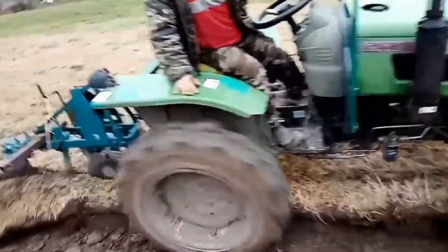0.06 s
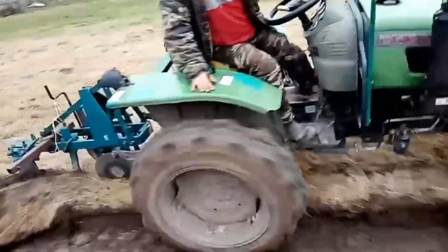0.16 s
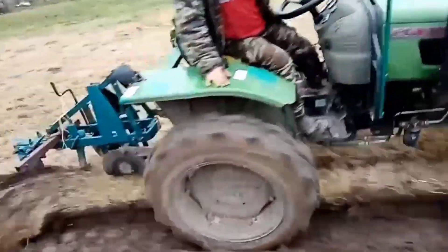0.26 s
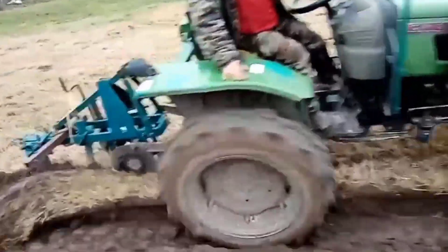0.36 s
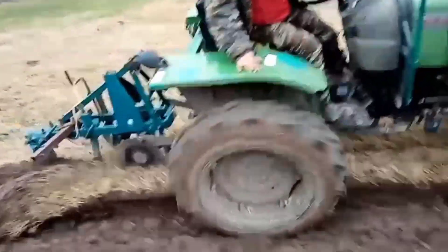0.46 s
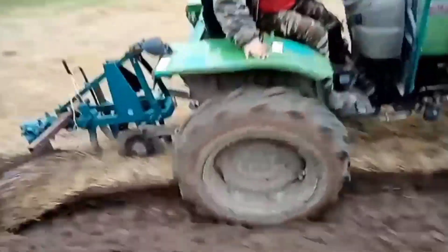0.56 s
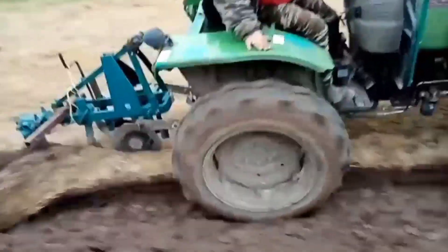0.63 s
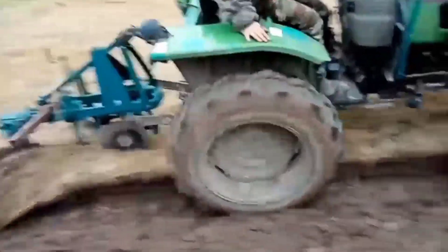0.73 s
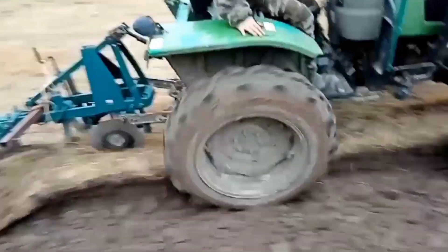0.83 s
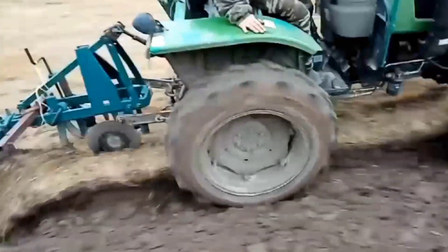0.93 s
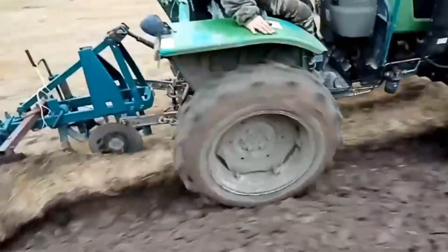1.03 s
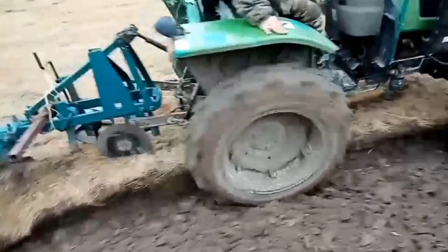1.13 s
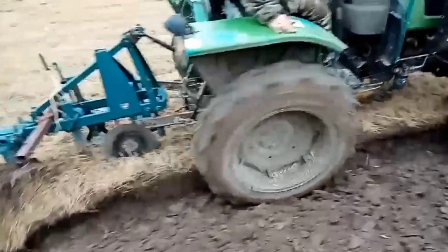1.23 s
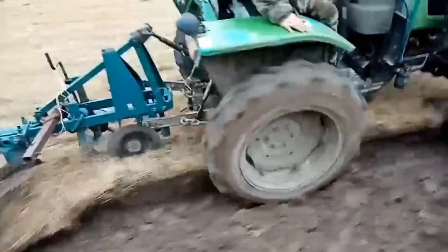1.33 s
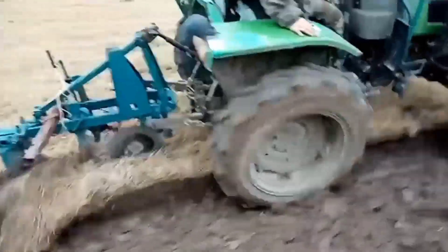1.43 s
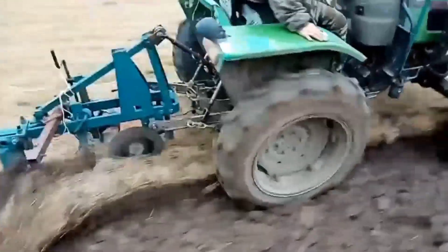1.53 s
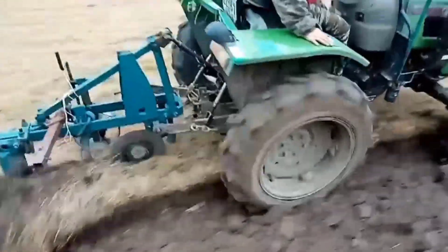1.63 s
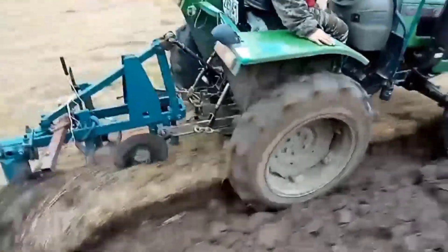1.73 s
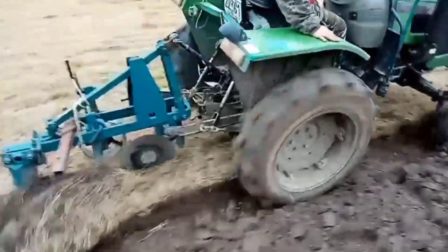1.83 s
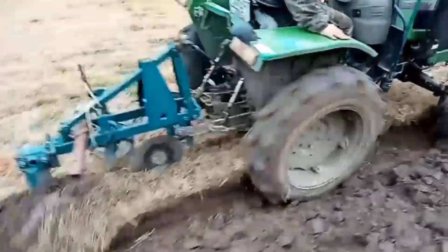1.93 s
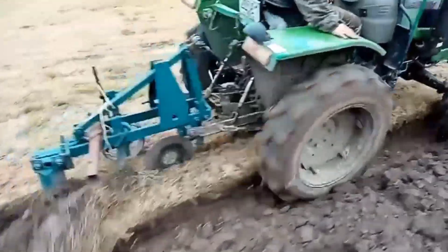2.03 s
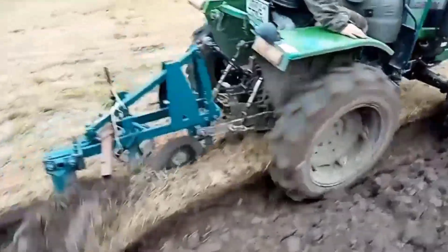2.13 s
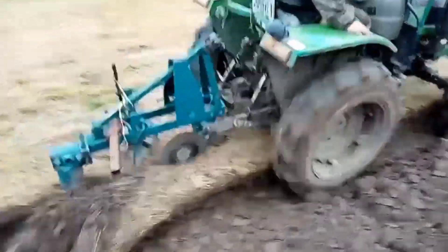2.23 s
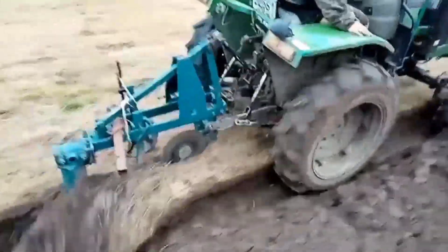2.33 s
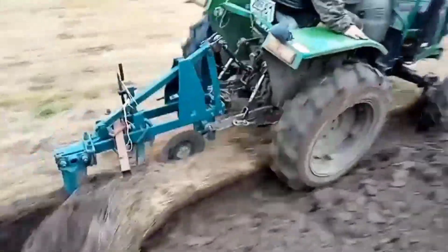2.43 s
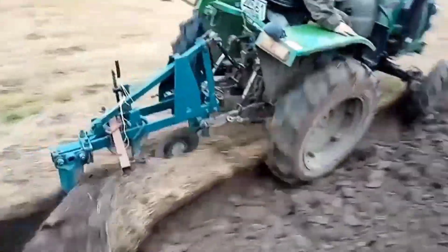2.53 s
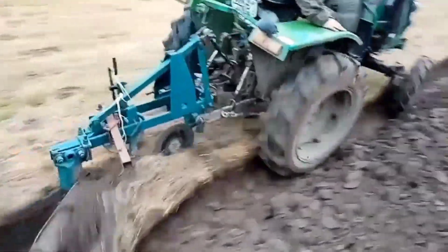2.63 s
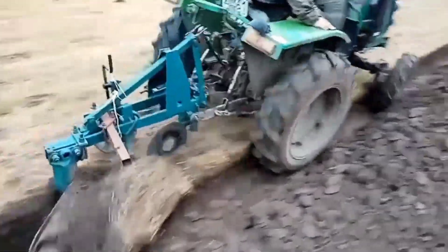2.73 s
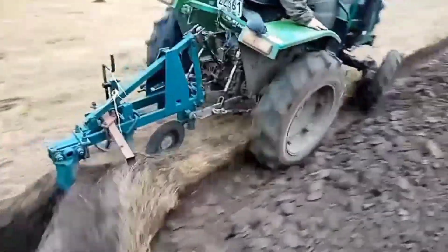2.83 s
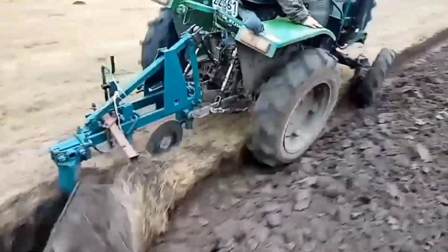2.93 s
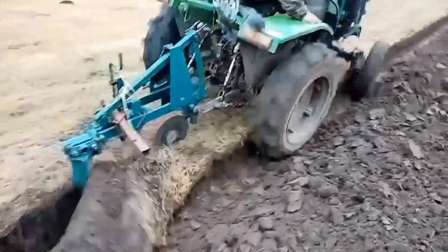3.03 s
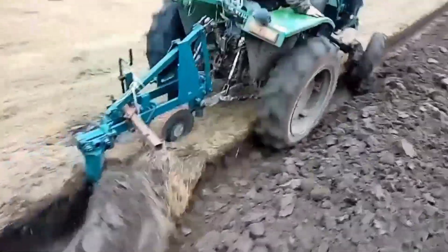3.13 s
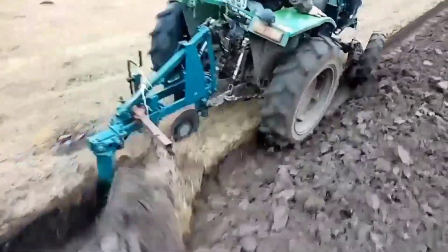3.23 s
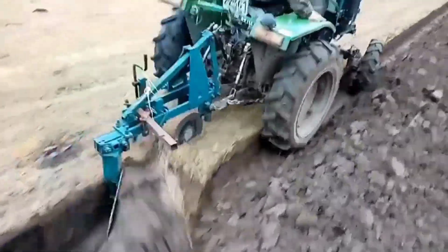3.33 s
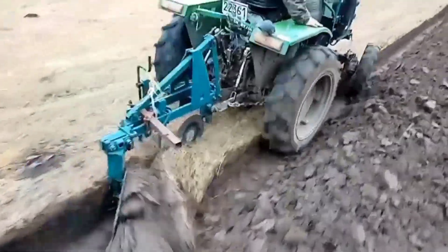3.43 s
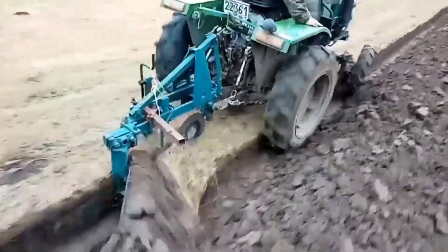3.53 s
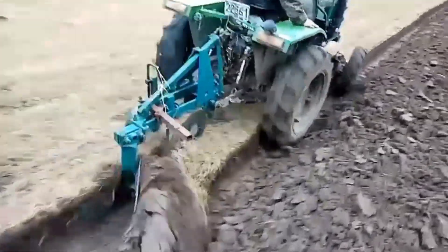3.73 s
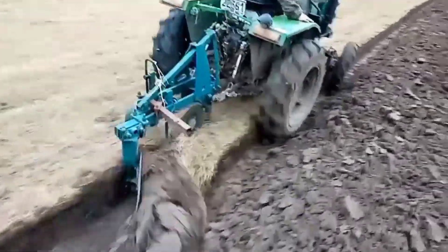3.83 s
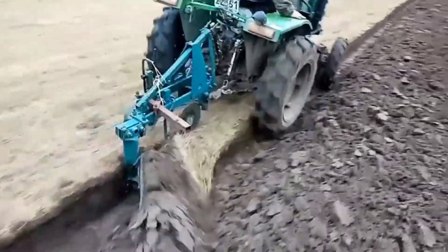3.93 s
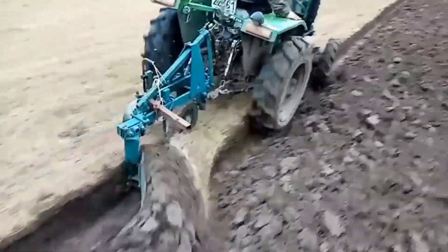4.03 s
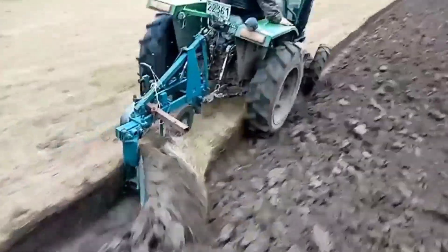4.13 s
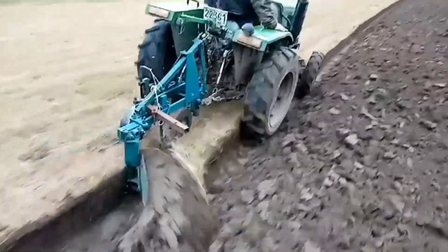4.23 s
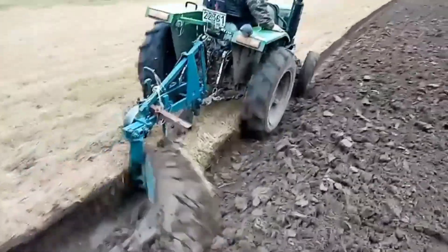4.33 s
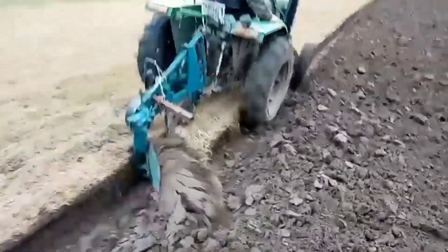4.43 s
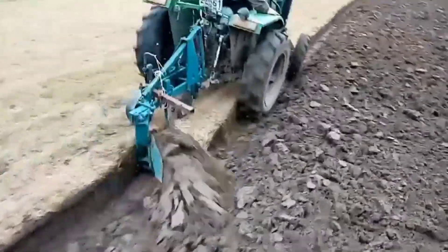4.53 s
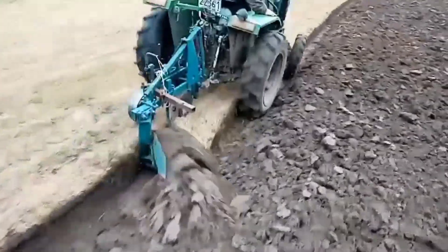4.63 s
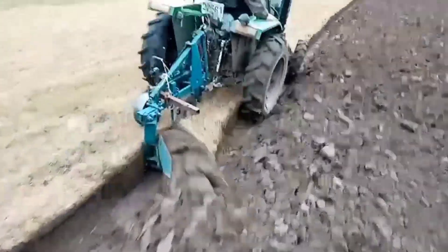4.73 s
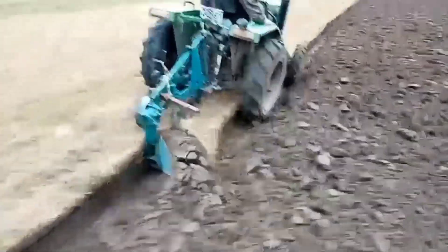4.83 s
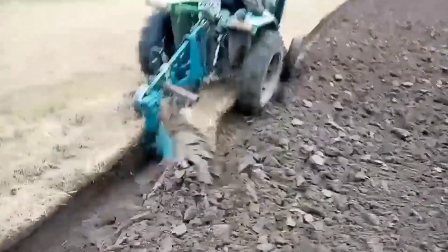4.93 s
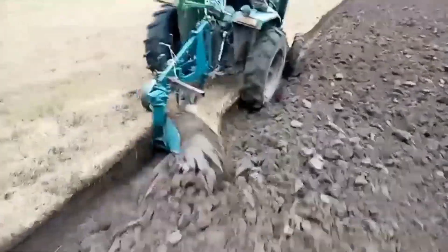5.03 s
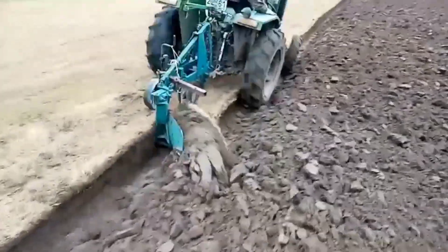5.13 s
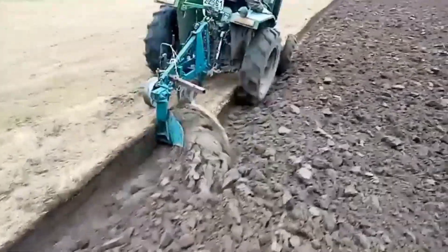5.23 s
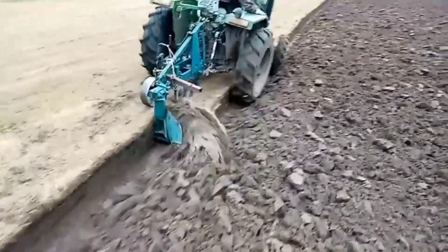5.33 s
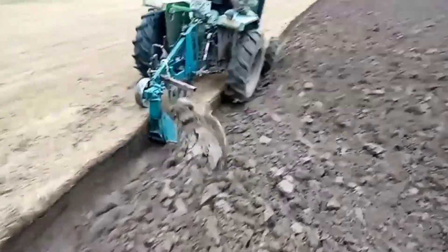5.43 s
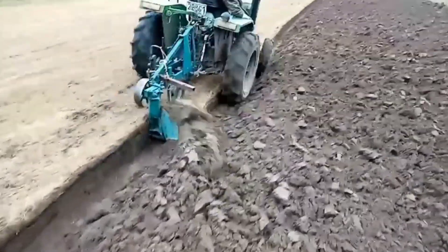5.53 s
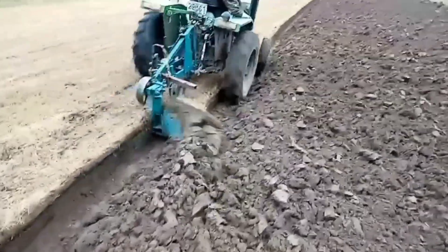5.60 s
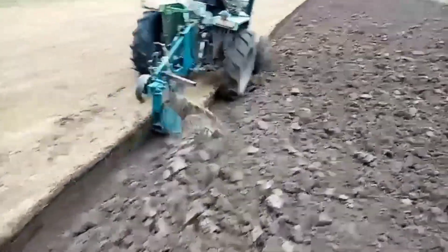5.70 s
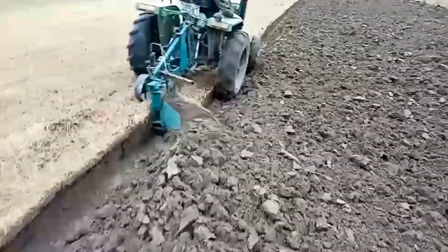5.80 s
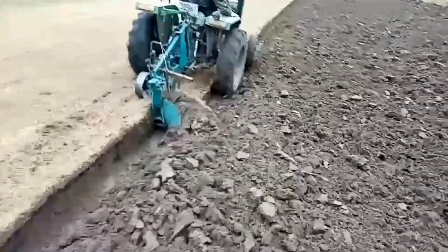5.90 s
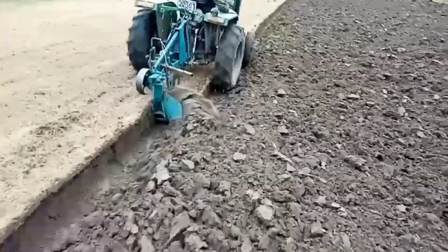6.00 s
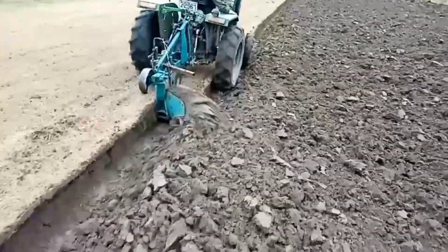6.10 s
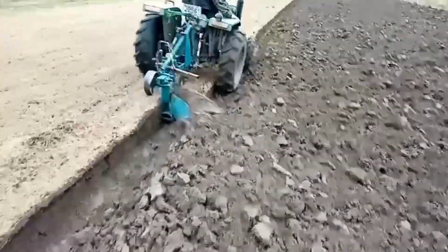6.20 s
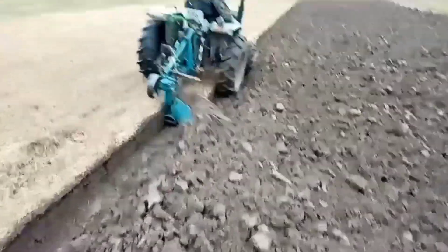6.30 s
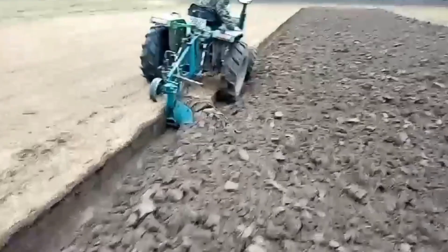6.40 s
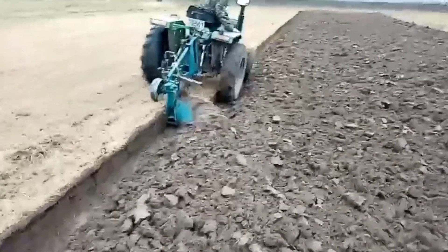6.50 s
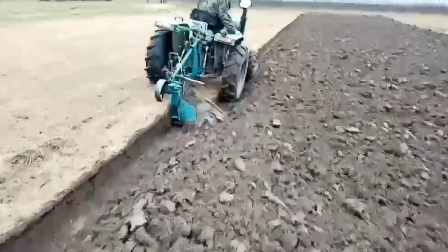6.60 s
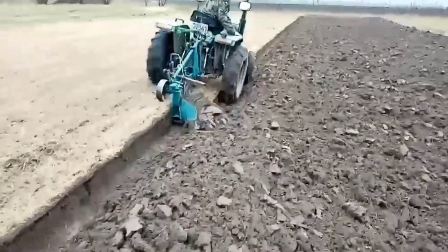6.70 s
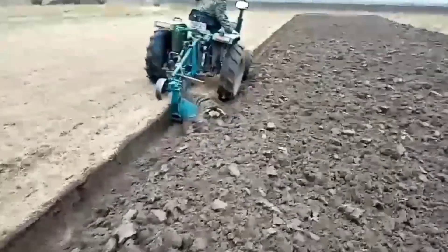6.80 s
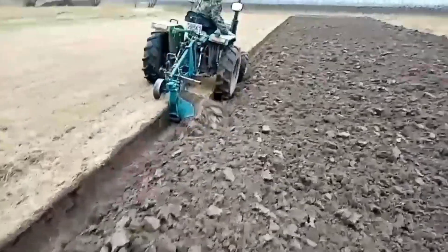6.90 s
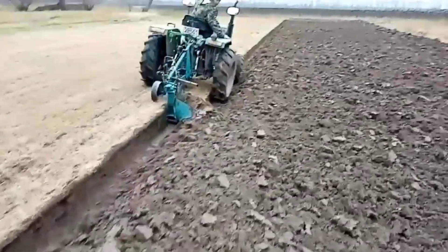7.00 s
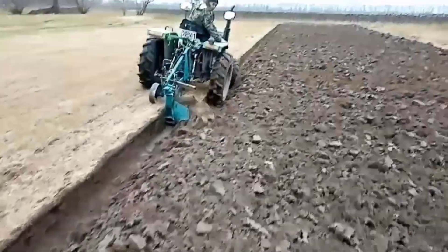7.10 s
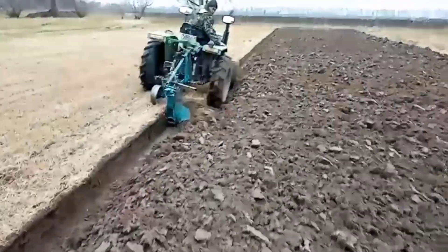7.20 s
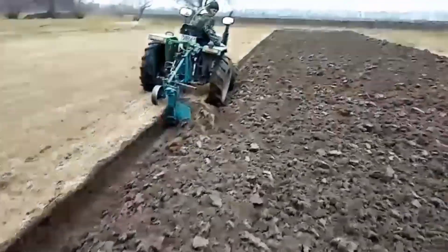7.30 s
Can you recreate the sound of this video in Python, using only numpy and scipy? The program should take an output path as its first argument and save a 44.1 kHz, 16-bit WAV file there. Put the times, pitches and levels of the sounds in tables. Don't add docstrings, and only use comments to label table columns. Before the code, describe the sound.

A small three-cylinder diesel tractor drones and clatters steadily as it passes close by and slowly pulls away, with a few tiny metallic squeaks.

```python
import sys
import numpy as np
from scipy import signal
from scipy.fft import rfft, irfft, next_fast_len
from scipy.io import wavfile
from scipy.ndimage import uniform_filter1d, map_coordinates

SR = 44100
rng = np.random.default_rng(int(sys.argv[2]) if len(sys.argv) > 2 else 0)


def to_wav(sig):
    pcm = np.clip(np.atleast_2d(sig), -1, 1) * 32767
    pcm = np.round(pcm).astype(np.int16)
    wavfile.write(sys.argv[1], SR, pcm.T)


def natural_amplitude(level_db):
    exponent = np.asarray(level_db, float) / 20
    return 10 ** exponent


N = 324135


def unit(x):
    return x / np.sqrt(np.mean(x ** 2) + 1e-20)


def along(points, hz):
    f, v = np.transpose(points)
    return np.interp(np.log(hz + 1), np.log(f + 1), v)


def curves(rows):
    s, *cols = np.transpose(rows)
    return [np.interp(np.arange(N) / SR, s, c) for c in cols]


def wobble(rate):
    knots = rng.standard_normal(int(N * rate / SR) + 4)
    return map_coordinates(knots, [np.arange(N) * rate / SR])


def filtered(x, response):
    m = next_fast_len(N + 8192)
    return irfft(rfft(x, m) * response(np.fft.rfftfreq(m, 1 / SR)), m)[..., :N]


def patchy(patchy_db):
    z = signal.stft(rng.standard_normal((2, N)), nperseg=512)[2]
    field = rng.standard_normal(z.shape[1:])
    field = uniform_filter1d(field, size=4, axis=0)
    field = uniform_filter1d(field, size=12, axis=1)
    return signal.istft(z * natural_amplitude(patchy_db * unit(field)), nperseg=512)[1][:, :N]


# (time [s], firing rate [1/s])
FIRING_RATE = [(0.0, 52.08), (0.6, 51.9), (1.08, 50.83), (1.35, 52.37), (1.62, 51.35), (2.32, 52.29),
               (2.7, 51.93), (3.36, 52.36), (3.37, 51.91), (3.82, 51.25), (4.24, 52.03), (4.65, 52.36),
               (4.88, 51.23), (5.43, 52.16), (6.16, 51.74), (6.41, 52.35), (6.69, 50.85), (7.35, 51.8)]


def firings():
    return np.cumsum(curves(FIRING_RATE)[0]) / SR


BEARINGS = [-25, 20, 42, 60, 71]


def heard(patterns):
    nearest_m, nearest_s, drive_m_per_s = 2.5, 1.0, 1.1
    gone = drive_m_per_s * (np.arange(N) / SR - nearest_s)
    bearing = np.degrees(np.arctan2(gone, nearest_m))
    loss_db = 20 * np.log10(np.hypot(gone, nearest_m) / nearest_m)
    return [np.interp(bearing, BEARINGS, db) - loss_db for db in patterns]


# (frequency [Hz], density [dB per Hz])
SCRAPE = [(3000, -22), (4500, -4), (6000, 0), (8000, -5), (11000, -8), (16000, -16)]
# (time [s], length [s], tone [Hz], tone level [dB], scrape level [dB])
SQUEAKS = [
    (1.814, 0.02, 5650, -31, -34),
    (2.783, 0.019, 5500, -31, -25.5),
    (2.918, 0.02, 5520, -28, -33),
    (3.088, .022, 6900, -41, -26.5),
    (3.682, 0.027, 5270, -36, -26.5),
    (3.683, 0.0084, 6270, -23, -42),
    (5.59, .015, 7100, -44, -57),
]


def linkage():
    t = np.arange(N) / SR
    rough = np.cumsum(90 * wobble(200)) / SR
    scrape = unit(filtered(rng.standard_normal(N), lambda f: natural_amplitude(along(SCRAPE, f))))
    out = np.zeros(N)
    for s, length, hz, tone_db, scrape_db in SQUEAKS:
        turn = 2 * np.pi * (hz * t + rough)
        squeak = np.sin(turn) + 0.35 * np.sin(2 * turn)
        envelope = np.exp(-((t - s) / length) ** 2)
        out += envelope * (natural_amplitude(tone_db + 3.0) * squeak + natural_amplitude(scrape_db) * scrape)
    return out


def repeating(count):
    place = (firings() / 3 % 1 * 2550).astype(int)
    shapes = rng.standard_normal((count, 2, 2552))
    weights = np.array([wobble(1.605) for _ in shapes])
    weights /= np.linalg.norm(weights, axis=0)
    return sum(w * shape[:, place] for w, shape in zip(weights, shapes))


# (time [s], turned away [0-1], lead of the left microphone [samples])
PASS = [
    (0, 0, 33.2),
    (1.5, 0.29, 32.6),
    (3.3, 0.83, 36.8),
    (5, 1, 41.7),
    (7.35, 1, 42),
]
# (time [s], pointing away [0-1])
BEHIND = [
    (0, 0),
    (1.5, .25),
    (3.3, .95),
    (7.35, 1.1),
]
CYLINDERS = [.88, .82, 1.25]
# (frequency [Hz], density [dB per Hz])
NEAR = [(200, -11.5), (400, -9), (540, -5), (1150, -5.5), (1450, -4), (2200, -1), (2700, -7), (3800, -12.5),
        (5600, -13.5), (6300, -8.5), (8500, -15), (9300, -20), (13600, -21), (14900, -6)]
FAR = [(200, -15), (400, -22.5), (540, -6.5), (1150, -9.5), (1450, 0), (2200, -3), (2700, -12.5),
       (3800, -17), (5600, -15.5), (6300, -12), (8500, -22.5), (9300, -28), (13600, -29.5), (14900, -20)]
# (frequency [Hz], width [Hz], level beside [dB], level behind [dB])
PANELS = [(1030, 22, -8, -1.5), (1453, 52, -10.5, -4.5), (1544, 59, -3, -5.5), (1708, 71, 0, -4.5),
          (2185, 100, -37, -0.5), (2330, 42, -16, -6), (2896, 300, -9, 3.5), (4875, 58, -3.5, 0),
          (6270, 39, 5, -4), (6650, 90, 0, -4), (6920, 42, -7, 0), (7310, 100, -1, -23)]


def mechanical(burns, lo_hz, hi_hz, blow, width, repeat, patchy_db):
    away = curves(PASS)[0]
    phase = firings() - .88 + .28 * curves(BEHIND)[0]

    def flare(lag, fall):
        since = (phase - lag) % 1
        return np.exp(-since / fall) * np.minimum(since / .04, 1)

    def ring(f, side):
        modes = (natural_amplitude(db[side]) * 1j * f * w / (c * c - f * f + 1j * f * w) for c, w, *db in PANELS)
        return 1 + sum(modes)

    def band(f):
        return 1 / np.sqrt((1 + (lo_hz / (f + 1)) ** 8) * (1 + (f / hi_hz) ** 8))

    firing = np.floor(phase).astype(int)
    strength = np.take(CYLINDERS, firing % 3) * burns[firing]
    crack = flare(.04, .045) + .25 * flare(.5, .1)
    gate = 1 + blow * strength * (flare(0, width) + crack)
    noise = gate * (unit(patchy(patchy_db)) + repeat * repeating(count=4))
    near = unit(filtered(noise, lambda f: band(f) * ring(f, 0) * natural_amplitude(along(NEAR, f))))
    far = unit(filtered(noise, lambda f: band(f) * ring(f, 1) * natural_amplitude(along(FAR, f))))
    return (1 - away) * near + away * far


ENGINE = [
    (-35, -36, -32, -31, -32),
    (-28, -27, -28.5, -28, -27.5),
    (-29, -31.5, -30, -32, -33.5),
    (-32.5, -33.5, -34, -37, -45),
]
LOAD_DB = [-0.018, 0.21, 0.67, -0.41]


def engine():
    free_rate = 51.8
    load_db = np.outer(LOAD_DB, free_rate - curves(FIRING_RATE)[0])
    intake_db, knock_db, valves_db, fan_db = heard(ENGINE) + load_db
    shake = 0.33 * wobble(9)
    burns = natural_amplitude(1.5 * rng.standard_normal(500))
    ground = natural_amplitude(-57) * mechanical(burns, 18, 70, blow=0, width=.5, repeat=0, patchy_db=7)
    rumble = natural_amplitude(intake_db - 2.5) * mechanical(
        burns, 75, 330, blow=.1, width=.5, repeat=.5, patchy_db=.4)
    intake = natural_amplitude(intake_db + 6.0 + 0.35 * wobble(8.1)) * mechanical(
        burns, 250, 1020, blow=0.64, width=0.15, repeat=0.76, patchy_db=0.5)
    knock = natural_amplitude(knock_db + 4 + shake) * mechanical(
        burns, 1210, 3050, blow=1.0, width=0.36, repeat=1.3, patchy_db=3.7)
    valves = natural_amplitude(valves_db + 5 + shake) * mechanical(
        burns, 3580, 9900, blow=0.41, width=0.7, repeat=0.18, patchy_db=1.37)
    fan = natural_amplitude(fan_db + 10.0 + 0.74 * wobble(14)) * mechanical(
        burns, 8800, 15900, blow=0.67, width=0.87, repeat=0, patchy_db=1.5)
    return ground + rumble + intake + knock + valves + fan


EXHAUST = [
    (-22.5, -28.5, -26.5, -24.5, -20.5),
    (-23.5, -25, -25, -24, -28),
    (-32.5, -35, -29.5, -29, -31),
    (-33, -36, -36, -33, -34.5),
]
STAGES = [1, 3.5, 6.4]
# (multiple of the engine cycle, level beside [dB], level passing [dB], level behind [dB])
UNEVEN = [(3.02, -41, -42.5, -47), (3.95, -58, -53, -64), (7.02, -52, -44.5, -49), (8.03, -43, -55, -51),
          (9.96, -46.5, -52, -50.5), (11.07, -45.5, -57, -54.5), (14.025, -48.5, -53.5, -52.5),
          (17.09, -58, -52, -53), (18.09, -42.5, -41, -48), (20.85, -53, -51.5, -52.5),
          (21.8, -50, -47, -63), (27, -55, -65, -67), (27.9, -60, -47, -54), (30.04, -47, -37, -42),
          (31.05, -68, -47, -72), (31.55, -47, -50, -68), (33.7, -39, -48, -69), (34.16, -55, -38, -54),
          (35.4, -56, -43, -61.5), (39, -57, -42, -46.5), (59.14, -59, -44, -46.5),
          (83.8, -38.5, -40.5, -50)]


def exhaust():
    turn = 2 * np.pi * firings()
    behind = curves(BEHIND)[0]

    def spread(k):
        return 1.8 + .35 * k * k + .3 * (k == 2) + 1.3 * abs(k - 2) ** .8 * behind

    tone = np.zeros(N)
    for k, db in enumerate(heard(EXHAUST), 2):
        tone += natural_amplitude(db + 0.29 * wobble(14)) * np.cos(k * turn + spread(k))
    for n, *stage_db in UNEVEN:
        nearest = 3 * round(n / 3)
        free = abs(n - nearest) > .1
        n = n if free else nearest
        loose = .1 + .9 * free * (n < 50)
        drift = free * (6 * rng.random() + .5 * wobble(2.05))
        level_db = np.interp(np.arange(N) / SR, STAGES, stage_db) + 2.34 * loose * wobble(3)
        tone += natural_amplitude(level_db) * np.cos(n / 3 * turn + spread(n / 3) + drift)
    return np.sqrt(2) * tone


# (frequency [Hz], level [dB])
LEFT = [(100, -3.5), (1000, -3.5), (1450, -5), (2200, -9), (3200, 1), (5000, -3), (6300, -8), (8300, -4),
        (9300, -10), (11000, -13), (13000, -27), (15000, -27)]
# (frequency [Hz], likeness [0-1])
ALIKE = [(300, 0.98), (600, 0.99), (1100, 0.6), (1450, 0.85), (2200, 0.22), (3800, 0.35), (8000, 0.2),
         (12000, .05)]


def scene():
    direct, scattered = engine()
    joints = linkage()
    direct = direct + exhaust() + joints
    scattered = scattered + joints
    early = map_coordinates(direct, [np.arange(N) + curves(PASS)[1]], mode="reflect")

    def alike(f):
        return np.clip(along(ALIKE, f), 0, 1)

    left = filtered(early, lambda f: alike(f) * natural_amplitude(along(LEFT, f)))
    left += filtered(scattered, lambda f: np.sqrt(1 - alike(f) ** 2) * natural_amplitude(along(LEFT, f)))
    return np.array([left, direct])


# (frequency [Hz], readiness left, right early, right late [standard deviations])
STARVED = [(3000, -3, -3, -3), (4400, -1.8, -1.9, -2), (7000, -2.5, -3, -3), (8500, -1.6, -3, -2.8),
           (9100, .3, -2.2, .2), (9550, .4, -1.5, .5), (10000, 0, -2, -2.2), (11600, .6, -1.5, -1),
           (12700, .2, -.8, -1), (13700, .8, -2.2, -.8), (14500, -.4, -3.5, -3), (15200, .3, -4, -4),
           (15500, 3, -4, -4)]
# (start [s], end [s], low edge [Hz], high edge [Hz], readiness [standard deviations])
GAP = (1.45, 2.55, 3200, 3750, .5)


def starve(x):
    hz, s, z = signal.stft(x, SR, "cosine", nperseg=2048, noverlap=1024)
    broad = 2 * uniform_filter1d(rng.standard_normal((2, 86, len(s))), size=4, axis=2)
    fine = rng.standard_normal((2, 257, len(s)))
    luck = .95 * np.repeat(broad, 12, axis=1)[:, :len(hz)] + .4 * np.repeat(fine, 4, axis=1)[:, :len(hz)]
    f, *columns = np.transpose(STARVED)
    left, early, late = (np.interp(hz, f, c, left=-9)[:, None] for c in columns)
    right = early + (late - early) * np.clip((s - 1.6) / 1.4, 0, 1)
    keep = (luck > np.array([left + 0 * s, right])) * (hz < 15520)[:, None]
    t0, t1, lo, hi, ready = GAP
    inside = ((hz > lo) & (hz < hi))[:, None] * (s > t0) * (s < t1)
    gap = (luck[0, 160] + .6 * luck[1] < ready) * inside
    stray = (luck[0] > 1.9 + .08 * s) * ((hz > lo) & (hz < 5600))[:, None]
    z = z - (gap | stray) * z.mean(axis=0)
    return signal.istft(z * keep, SR, "cosine", nperseg=2048, noverlap=1024)[1][:, :N]


def roll_off(x):
    return signal.sosfilt(signal.butter(12, 15780, fs=SR, output="sos"), x)


def record(dry):
    mix = starve(dry)
    return roll_off(mix)


dry = scene()
out = record(dry)
to_wav(out)
```